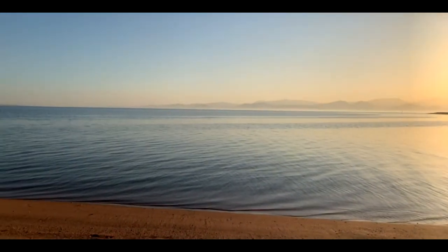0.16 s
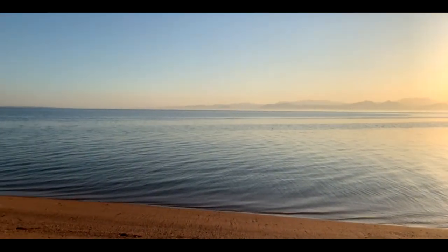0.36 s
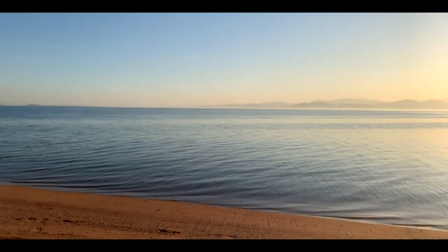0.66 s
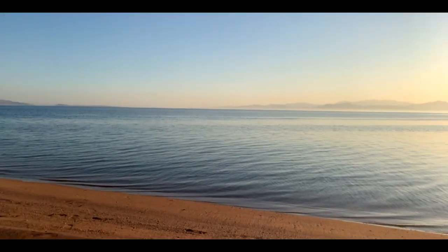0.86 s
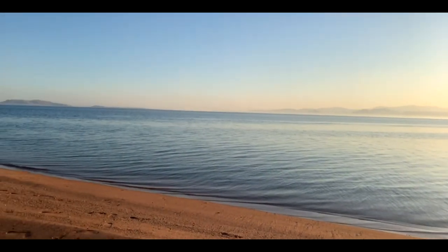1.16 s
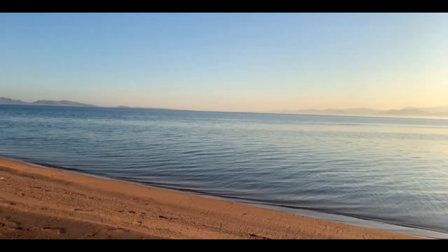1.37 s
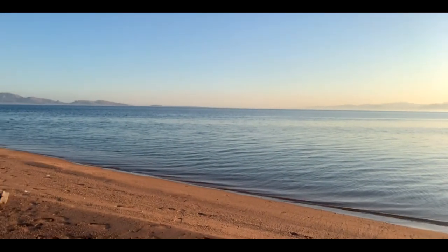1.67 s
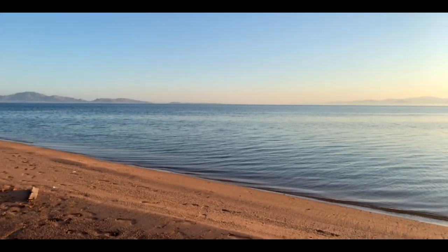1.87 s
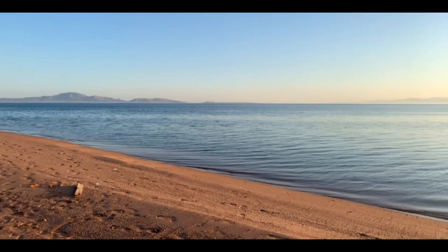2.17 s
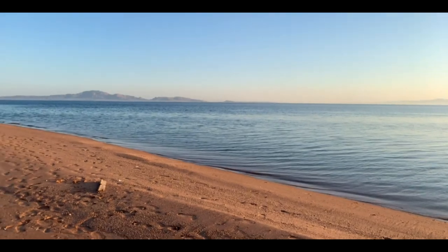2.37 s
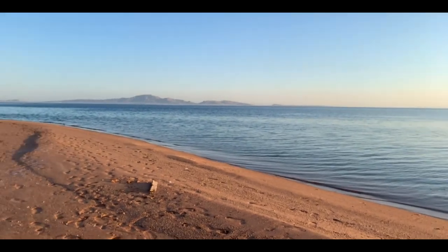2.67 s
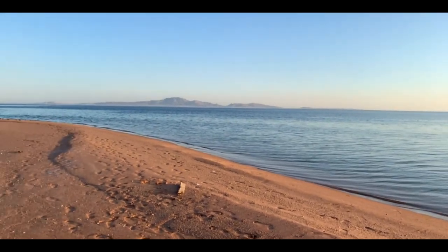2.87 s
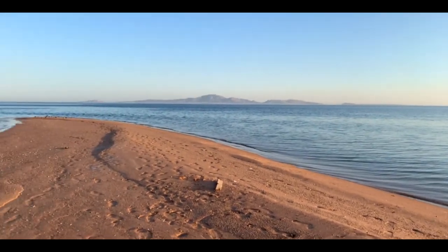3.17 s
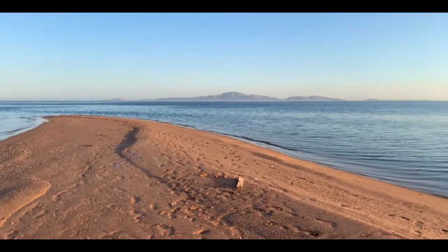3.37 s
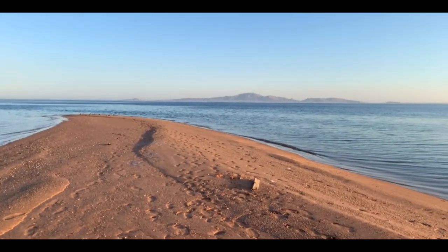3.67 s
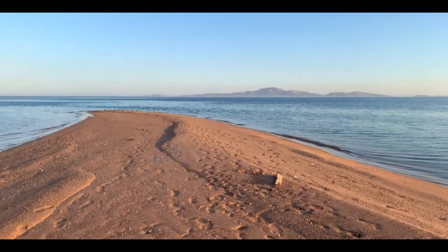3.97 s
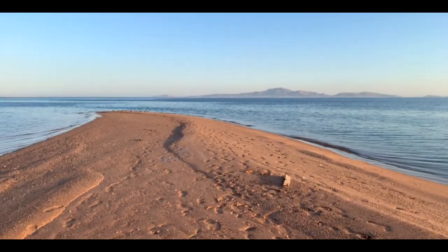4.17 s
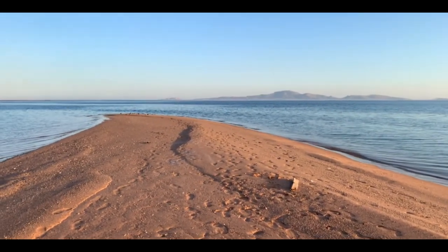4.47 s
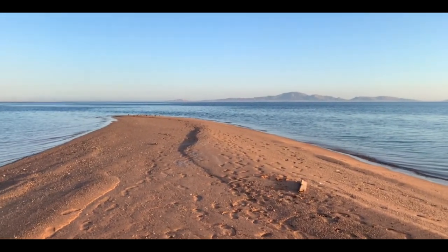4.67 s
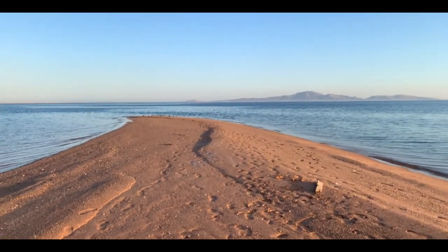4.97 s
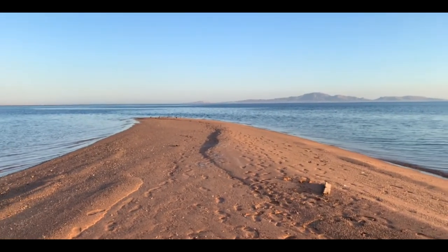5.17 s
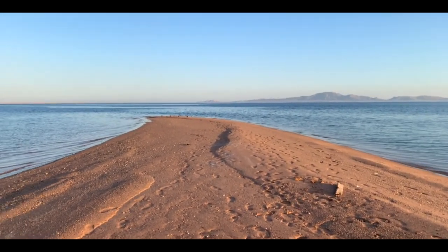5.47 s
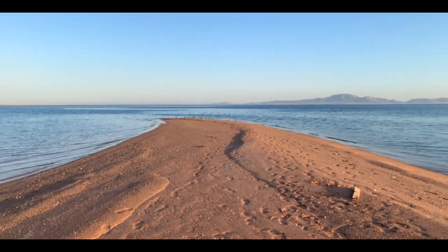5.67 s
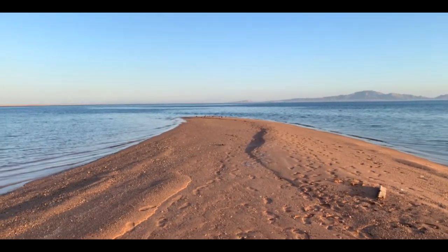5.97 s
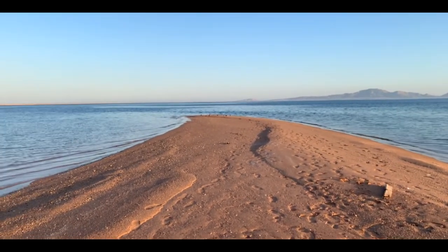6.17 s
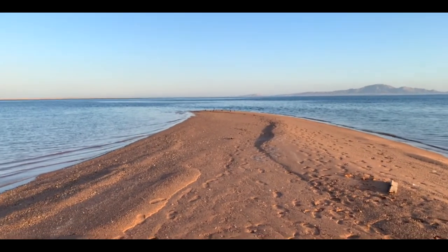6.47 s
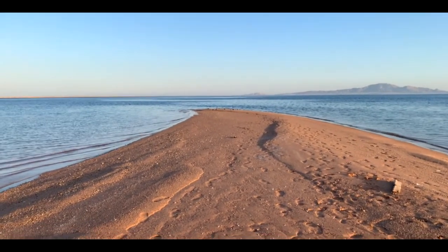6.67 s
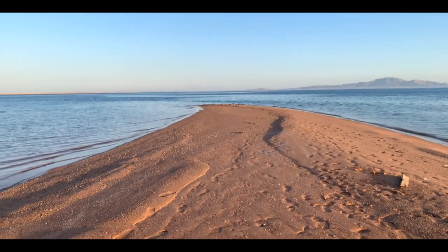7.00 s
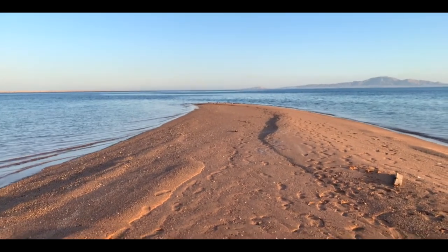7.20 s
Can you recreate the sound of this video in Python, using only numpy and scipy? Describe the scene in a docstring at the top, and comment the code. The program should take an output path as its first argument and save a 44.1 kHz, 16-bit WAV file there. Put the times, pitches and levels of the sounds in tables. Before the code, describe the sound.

Low wind rumble over a calm beach, trilling shore birds calling in a flock, then gentle lapping wavelets with plops and ticks.

```python
"""Wind thumps and buffets the microphone on a sand spit in a calm sea, and shore birds call from its tip.
Wind is shaped noise swelling in gusts; wavelets are clouds of bubbles with hiss, that slosh, splash and fizz.
Plops, gurgles and ticks are single ringing bubbles, rising tones and short cracks of noise.
The birds are gliding, often trilled harmonics: single calls nearer by, a rough overlapping flock behind.
The sound drops out once for an instant."""
import sys
import numpy as np
from scipy import signal
from scipy.fft import rfft, irfft, next_fast_len
from scipy.io import wavfile
from scipy.ndimage import uniform_filter1d

SR = 44100
rng = np.random.default_rng(int(sys.argv[2]) if len(sys.argv) > 2 else 0)


def materialize(psi):
    """Save the field psi as 16-bit PCM at rate SR to the path in sys.argv[1].

    A 1-D psi becomes a single channel; in a 2-D psi each row is a channel.
    """
    bounded = np.clip(np.atleast_2d(psi).T, -1, 1)
    quanta = np.round(bounded * 32767).astype(np.int16)
    wavfile.write(sys.argv[1], SR, quanta)


N = 323694
TIME = np.arange(N) / SR


def undb(db):
    """Decibels to gain."""
    return 10 ** (np.asarray(db) / 20)


def unit(x):
    """Scale to rms 1."""
    return x / np.sqrt(np.mean(x ** 2) + 1e-20)


def curve(table):
    """Join (time [s], level [dB]) points by straight lines, sample by sample."""
    times, levels_db = np.transpose(table)
    return np.interp(TIME, times, levels_db)


def colour(x, points):
    """Filter by a spectrum of (frequency [Hz], level [dB]) points, falling away beyond both ends; rms 1."""
    hz, db = np.transpose(points)
    f = np.maximum(np.arange(N + 1) * SR / (2 * N), 1)
    skirts = np.minimum(f / hz[0], 1) ** 2 * np.minimum(hz[-1] / f, 1) ** 2
    shape = skirts * undb(np.interp(np.log(f), np.log(hz), db))
    size = next_fast_len(N + SR // 10)
    gain = np.interp(np.arange(size // 2 + 1) * SR / size, f, shape)
    return unit(irfft(rfft(x, size) * gain, size)[:N])


def walk(rate):
    """Smooth random motion of rms 1, taking a new step `rate` times a second."""
    k = max(int(SR / rate), 2)
    steps = np.repeat(rng.standard_normal(N // 10)[:N // k + 1], k)
    return unit(uniform_filter1d(uniform_filter1d(steps, k), k)[:N])


def add(out, start_s, sound):
    """Mix a sound in at a time."""
    i = int(np.clip(start_s * SR, 0, N))
    out[i:i + len(sound)] += sound[:N - i]


def gust(peak_s, spread_s):
    """Pressure of one gust: a bell-shaped swell."""
    return np.exp(-.5 * ((TIME - peak_s) / spread_s) ** 2)


def turbulence(points, steady_s):
    """Eddy pressure with its own slow swell levelled out, leaving that to the gusts."""
    x = colour(rng.standard_normal(N), points)
    return x / np.sqrt(uniform_filter1d(x ** 2, int(steady_s * SR)) + 1e-6)


def wind():
    """Large eddies rumble; stronger gusts shed small, quick ones that buffet."""
    # spectra of the large and the small eddies: (frequency [Hz], level [dB])
    rumble_spectrum = [(12, -11.5), (25, -8), (45, 1), (62, -0.5), (90, -3), (125, -15.5), (200, -33),
                       (400, -58.5)]
    buffet_spectrum = [(50, -11.5), (100, 0.5), (140, 2.5), (190, -5), (260, -14), (400, -27.5),
                       (800, -53.5), (2000, -58)]
    # rumble of the breeze between the gusts: (time [s], level [dB])
    breeze = [(0, -35), (.3, -35), (.75, -30.5), (1.0, -36.5), (1.8, -32.5), (2.3, -31.5), (2.85, -26.5),
              (3.1, -36), (3.4, -39.5), (4.2, -43.5), (5.2, -41), (5.7, -41.5), (6.1, -39.5), (6.55, -37),
              (6.95, -34), (7.1, -41.5), (7.34, -43)]
    # gusts on the microphone: (peak time [s], spread [s], rumble [dB], buffeting before its lift [dB])
    gusts = [(0.174, 0.069, -23.5, -31.5), (0.243, 0.052, -25, -43), (0.396, 0.0086, -20.5, -40),
             (0.507, 0.017, -34, -39), (.84, 0.042, -26, -34), (1.212, 0.053, -28, -49),
             (1.48, 0.018, -30, -40.5), (1.904, 0.013, -19.5, -33), (1.971, 0.015, -21, -31),
             (2.126, .04, -20.5, -35), (2.236, 0.022, -22, -30), (2.345, 0.013, -20.5, -50),
             (2.432, 0.023, -23, -30), (2.621, 0.065, -24, -34), (2.836, .09, -26, -34),
             (3.185, 0.052, -32, -59), (3.81, .025, -36, -64), (4.03, 0.022, -31.5, -65),
             (4.557, .03, -36, -58), (4.79, 0.028, -37, -50), (5.004, 0.021, -36.5, -51),
             (5.163, .03, -35.5, -58), (5.457, 0.08, -33.5, -50), (5.95, 0.08, -29, -45.5),
             (6.292, 0.075, -30.5, -48.5), (6.482, 0.054, -26.5, -40.5), (6.736, 0.029, -30, -42),
             (6.93, 0.11, -30.5, -57)]
    breeze_buffet_db, buffet_lift_db = -12, 1.4  # the first is relative to the breeze's rumble

    breeze_db = curve(breeze)
    slow_power = undb(breeze_db) ** 2
    quick_power = undb(breeze_db + breeze_buffet_db) ** 2
    for peak_s, spread_s, rumble_db, buffet_db in gusts:
        power = gust(peak_s, spread_s) ** 2
        slow_power = slow_power + power * undb(rumble_db) ** 2
        quick_power = quick_power + power * undb(buffet_db) ** 2
    rumble = turbulence(rumble_spectrum, steady_s=0.0887) * undb(1.13 * walk(7.9))
    buffet = unit(turbulence(buffet_spectrum, steady_s=0.09) * undb(3.4 * walk(70)))
    return rumble * np.sqrt(slow_power) + buffet * np.sqrt(quick_power) * undb(buffet_lift_db)


def lap(break_s, build_s, run_s):
    """A wavelet builds up, breaks and runs out on the sand."""
    t = TIME - break_s
    return np.exp(-np.where(t < 0, (t / build_s) ** 2, t / run_s))


def bubble(hz, cycles, rise):
    """A pocket of air rings and dies; its pitch climbs from hz as it nears the surface."""
    life = cycles / hz
    u = np.arange(int(life * SR) + 2) / (life * SR)
    ring = np.sin(2 * np.pi * hz * life * (u + rise * u ** 2 / 2))
    return ring * np.exp(-4 * u) * (1 - np.exp(-u * 30))


def bubbles(low_hz, high_hz, cycles, spread_db, rise, count):
    """A cloud of bubbles at random times and pitches, many faint and a few loud; rms 1."""
    out = np.zeros(N)
    for when, pitch, size, ring in rng.random((count, 4)):
        gain = undb(-spread_db * np.log(size * .99 + .01))
        hz = low_hz * (high_hz / low_hz) ** pitch
        add(out, when * N / SR, gain * bubble(hz, cycles * (.5 + ring), rise))
    return unit(out)


def waves():
    """Each wavelet sloshes with large bubbles, splashes with small ones and fizzes into the sand."""
    # spectra of the three water sounds: (frequency [Hz], level [dB])
    slosh_spectrum = [(200, 14.5), (420, -4), (650, -3), (900, 1.5), (1300, -1), (2200, -11.5), (4000, -53)]
    splash_spectrum = [(600, -2.5), (1300, -6.5), (2400, 1.5), (3200, 3), (4100, -9.5), (5500, -13.5),
                       (8000, -21), (12000, -51)]
    fizz_spectrum = [(3000, 11), (4800, -1), (6000, -3), (7300, 1), (9200, -6.5), (10800, -14.5),
                     (13000, -12), (16000, -15)]
    # ripples all along the shore, before the lifts: (slosh [dB], splash [dB], fizz [dB])
    ripples_db = (-70, -63, -73)
    # wavelets reaching the sand, before the lifts: (break [s], build-up [s], run-out [s], splash [dB],
    #                                                slosh against splash [dB], fizz against splash [dB])
    wavelets = [(.17, 0.046, 0.23, -58.5, 2, -35), (.72, 0.092, 0.055, -65, 0, -28),
                (.92, 0.11, 0.3, -73.5, 13.5, -27), (1.38, 0.18, 0.6, -56, -10.5, -12.5),
                (2.06, 0.32, 0.2, -56.5, -12, -8.5), (2.3, 0.16, 0.48, -62.5, 2, -16.5),
                (3.22, 0.31, 0.27, -56, -8, -13.5), (3.52, 0.07, 0.13, -56, -8.5, -17),
                (3.7, .07, 0.17, -55, -1.5, -14), (3.92, 0.071, 0.091, -56, -3, -10),
                (4.05, 0.11, 0.21, -54.5, -9, -8.5), (4.24, 0.19, .2, -54.5, -4.5, -11.5),
                (4.63, 0.099, 0.13, -63, 3, -2.5), (4.86, 0.17, 0.27, -60.5, -7, -7),
                (5.3, 0.13, 0.19, -69, 3.5, 0.5), (6.16, 0.12, 0.45, -64.5, -4, -5),
                (6.4, 0.043, 0.37, -57, -6, -15.5), (7.06, 0.21, 0.42, -56.5, -6.5, -8),
                (7.32, .1, .3, -55.5, -3, -15)]
    slosh_lift_db, splash_lift_db, fizz_lift_db = 3.5, 4.5, 9.0
    fizz_lag_s = .015  # foam bursts just after the wavelet breaks

    slosh_power, splash_power, fizz_power = undb(ripples_db) ** 2
    for break_s, build_s, run_s, db, slosh_db, fizz_db in wavelets:
        power = (undb(db) * lap(break_s, build_s, run_s)) ** 2
        splash_power = splash_power + power
        slosh_power = slosh_power + power * undb(slosh_db) ** 2
        late_lap = lap(break_s + fizz_lag_s, build_s, run_s)
        fizz_power = fizz_power + (undb(db + fizz_db) * late_lap) ** 2
    large = bubbles(353.5, 1550, cycles=17, spread_db=2.0, rise=0.465, count=1400)
    small = bubbles(1012, 4550, cycles=22.4, spread_db=3.5, rise=0.4, count=6000)
    foam = bubbles(4120, 16100, cycles=26, spread_db=3.5, rise=0.042, count=4000)
    # the smallest, countless bubbles merge into a hiss
    slosh = colour(large + .9 * rng.standard_normal(N), slosh_spectrum)
    splash = colour(small + .9 * rng.standard_normal(N), splash_spectrum)
    fizz = colour(foam + 1.76 * rng.standard_normal(N), fizz_spectrum)
    water = slosh * np.sqrt(slosh_power) * undb(slosh_lift_db)
    water = water + splash * np.sqrt(splash_power) * undb(splash_lift_db)
    water = water + fizz * np.sqrt(fizz_power) * undb(fizz_lift_db)
    return water * undb(1.2 * walk(25))  # the water folds unevenly


def plops():
    """A drop slaps the surface and traps a bubble."""
    # single drops and air pockets: (time [s], level [dB], first pitch [Hz], length in cycles of that pitch)
    drops = [(0.327, -40, 1140, 14), (0.634, -37, 2540, 16), (1.608, -40, 1820, 14),
             (3.179, -32.5, 1510, 14), (3.319, -34.5, 1700, 21), (3.495, -28.5, 2270, 14),
             (3.6, -35, 2020, 17), (3.627, -34.5, 2260, 25), (3.708, -30, 2290, 23), (4.014, -34, 2180, 16),
             (4.123, -40, 1320, 13), (4.241, -34, 1310, 14), (4.633, -32.5, 1270, 16),
             (4.964, -34.5, 1810, 13), (5.27, -40, 1120, 28), (6.099, -38, 2030, 22),
             (6.131, -36, 2740, 16), (6.394, -37, 2070, 38), (6.584, -36, 2560, 26), (6.668, -35, 1990, 11),
             (6.995, -34, 1750, 28)]
    out, t = np.zeros(N), np.arange(SR // 30) / SR
    for start_s, db, hz, cycles in drops:
        slap = signal.lfilter([1, 1], [1, -.5], rng.standard_normal(len(t))) * np.exp(-t / 0.0021)
        add(out, start_s, undb(db) * bubble(hz, cycles, rise=0.37))
        add(out, start_s, undb(db - 25) * slap)
    return out


def gurgles():
    """Air trapped under a folding wavelet climbs in pitch as its pocket opens."""
    # rising pockets of air: (time [s], length [s], first pitch [Hz], last pitch [Hz], level [dB])
    pockets = [(0.129, 0.014, 800, 1110, -56), (0.163, 0.018, 790, 1560, -48),
               (0.58, 0.02, 1356, 2230, -50.5), (0.944, 0.035, 960, 1400, -59),
               (1.202, 0.038, 890, 1560, -58.5), (2.422, 0.049, 848, 1365, -55),
               (2.461, 0.035, 1700, 2530, -56.5), (2.783, 0.038, 1500, 2400, -60),
               (3.676, 0.042, 437, 534, -54.5), (3.771, 0.036, 557, 670, -57.5),
               (3.881, 0.032, 475, 574, -50), (3.886, .04, 658, 1460, -44),
               (4.013, 0.027, 937, 1040, -50.5), (4.234, 0.032, 514, 630, -66),
               (4.31, 0.027, 1130, 1620, -51), (6.265, 0.035, 890, 1040, -49),
               (6.895, 0.035, 820, 986, -50.5), (7.264, 0.048, 817, 1230, -56)]
    out, wobble = np.zeros(N), walk(350)
    for start_s, length, first_hz, last_hz, db in pockets:
        u = np.linspace(0, 1, int(length * SR))
        shake = np.roll(wobble, -int(start_s * SR))[:len(u)]
        hz = first_hz * (last_hz / first_hz) ** u * (1 + 0.059 * shake)
        swell = np.sqrt(u) * (1 - u) * undb(2.7 * shake[::-1])
        ring = np.sin(2 * np.pi * np.cumsum(hz) / SR) * swell
        add(out, start_s, undb(db) * unit(ring))
    return out


def ticks():
    """Tiny droplets burst with a short, bright crack: a decaying puff of noise in a narrow band."""
    # sharp ticks of spray: (time [s], peak level before a 2 dB cut [dB], pitch [Hz])
    spray = [(0.7564, -61, 13100), (1.608, -43, 4500), (2.5058, -45, 4600), (3.236, -40, 5710),
             (3.5129, -44.5, 7120), (3.5853, -46, 5250), (4.2872, -40, 5600), (6.129, -44, 8900),
             (6.159, -38.5, 4960), (6.392, -34, 4040), (6.604, -37, 3540), (6.7272, -42, 4500),
             (7.1497, -34.5, 5220), (7.21, -45, 9960)]
    out, t = np.zeros(N), np.arange(SR // 100) / SR
    for start_s, db, hz in spray:
        band = signal.butter(1, [.9 * hz, 1.04 * hz], "bandpass", fs=SR)
        crack = signal.lfilter(*band, rng.standard_normal(len(t)) * np.exp(-t / 0.0015))
        add(out, start_s, undb(db - 2) * crack / np.abs(crack).max())
    return out


def call(length, pitches, trill_hz, depth, harmonics_db, rasp, rolloff_db=10, edge_s=0.014):
    """One note: the syrinx follows an arched pitch; a trill cuts it into strokes that each hook downward."""
    t = np.arange(int(length * SR)) / SR
    rasp = rasp[:len(t)]
    beat = trill_hz * (t + .04 * np.cumsum(rasp) / SR) % 1  # position within the stroke, 0-1
    dip = (1 - np.sin(np.pi * beat ** 1.2)) ** 1.5
    # a smooth curve through evenly spaced pitches
    knots = np.linspace(0, length, len(pitches))
    arch = np.polyval(np.polyfit(knots, pitches, len(pitches) - 1), t)
    hook = depth * (.04 - .2 * dip - .09 * (beat - .5))
    hz = arch * (1 + hook + .006 * rasp)
    phase = 2 * np.pi * np.cumsum(hz) / SR
    # slow trills close the syrinx further between strokes than fast ones
    closure = np.clip(depth * np.interp(trill_hz, [50, 57], [1.3, .55]), 0, 1)
    stroke = 1 - closure * np.cos(np.pi * (beat - .08)) ** 4
    edges = np.clip(np.minimum(t, length - t) / edge_s, 0, 1)
    opening = edges * np.sin(np.pi * t / length).clip(0) ** 0.12
    opening = unit(opening * stroke * undb(1.6 * rasp[::-1]))
    # turbulent air spreads a hoarse skirt around every harmonic
    lowpass = signal.butter(2, 500, fs=SR, output="sos")
    air = unit(signal.sosfilt(lowpass, rng.standard_normal(len(t))))
    hoarse = 1 + undb(-25) * air
    # two more harmonics below the last one given
    upper_db = harmonics_db[-1] - rolloff_db - np.array([1.5, 0])
    tone = sum(undb(db) * np.sin(k * phase) for k, db in enumerate([*harmonics_db, *upper_db], 1))
    return np.sqrt(2) * opening * hoarse * tone


def near_birds():
    """The calls that stand out from the flock: each glides along an arch and is usually loudest at its octave."""
    # bird calls: (start [s], length [s], pitch at the middle before trill and rasp [Hz],
    #              glide from start to end [Hz], arch [Hz], trill rate [Hz], trill depth [0-1],
    #              octave [dB], fundamental against octave [dB], third harmonic against octave [dB])
    notes = [(.09, 0.14, 1630, -53, 100.5, 51.4, 0.4, -47.5, -23, -34),
             (0.209, .13, 1149, -6, -39.5, 49, 0.27, -53.5, -11, -4),
             (0.427, 0.17, 1794, -100, 182, 42.6, 0.43, -61.5, -4.5, -23),
             (0.56, 0.12, 1695, 88, -28, 50, 0.31, -56.5, -2, -13),
             (0.597, 0.18, 1200, -180, 27.5, 50, 0.38, -54, -20, -3),
             (0.81, 0.12, 1654, -35, 74, 49.6, 0.55, -58.5, -22, -20),
             (.91, 0.11, 1148, -130, 23, 49.5, 0.1, -58, -13, -9),
             (1.0, 0.12, 1730, -190, 65, 46.2, 0.32, -53.5, -28, -26),
             (1.121, 0.094, 1770, -100, 53, 44.7, 0.47, -57, -13, -24),
             (1.242, 0.14, 1548, -53, 117.5, 57.8, .14, -37, -23, -20),
             (1.256, 0.14, 1144, -240, 53, 49.6, 0.45, -54, -3, -4),
             (1.361, .17, 1232, -110, 46, 50.3, 0.4, -54, -11, 3.5),
             (1.36, 0.11, 1489, -30, 40.5, 58.6, 1.0, -37.5, -22, -22),
             (1.621, 0.086, 1330, 90, 202, 57, 0.43, -48, -5, -19),
             (1.686, .07, 1046, -200, -61, 55.3, 0.57, -47, -4, -15),
             (1.779, 0.13, 1695, 42, 171, 56, .5, -50, -4, -12),
             (1.895, 0.2, 1540, -190, 15.5, 58.1, 0.57, -48.5, -3, -12),
             (2.04, 0.13, 1593, -102, 116, 59.6, 0.09, -34, -36, -35),
             (2.064, .147, 1197, -100, 36, 54.3, 0.34, -46.5, -28, -17),
             (2.184, 0.084, 1600, 43, 126, 57.8, 0.47, -37.5, -32, -20),
             (2.282, .123, 1265, -240, -21, 50.3, 0, -60.5, -11, -2),
             (2.594, 0.18, 1712, -115, 56, 37.4, 0.4, -59, -18, -1),
             (2.999, 0.17, 1500, -49, 30.5, 51.8, .4, -53.5, 1, -7),
             (3.07, 0.14, 1236, -330, 8, 48.5, 0.37, -51.5, -17, -18),
             (3.206, 0.061, 1226, -64, 21, 50, 0.02, -52, -13, -10),
             (4.025, .125, 1868, -89, 150, 49.7, 0.67, -50, -6.5, -4.5),
             (4.146, 0.12, 1670, -190, 7, 50.3, .68, -57, -17, -9),
             (4.577, .144, 1332, -378, 17, 48.4, .25, -54.5, 1, -11),
             (4.833, 0.16, 1733, -43, 31.5, 37, .58, -65, 10, 10.5),
             (5.223, .107, 1836, 14, 215, 49.6, 0.6, -50.5, -7.5, -3),
             (5.319, 0.046, 1228, -10, -48, 46, 0.6, -51.5, -7.5, 0.5),
             (5.362, 0.04, 1606, -83, 6, 49.7, .86, -53, -14, -4),
             (5.692, 0.086, 1593, -230, 2, 50.3, 0.14, -70.5, 14.5, 5.5),
             (5.774, .07, 1257, -87, -16, 50.7, 0.19, -50, -5, -5.5),
             (6.43, .16, 1293, -350, -14, 51.5, 0.21, -52.5, -2, -14),
             (6.763, 0.13, 1763, 145, 89.5, 47.1, .8, -47.5, -10, -3),
             (6.851, 0.089, 1547, -86, 19, 46.4, 0.44, -59, -1, 8),
             (6.864, 0.11, 1717, -150, 0, 46.2, 0.72, -40.5, -20, -21),
             (7.262, 0.081, 1665, -340, 113, 50, 0.33, -57, 4.5, -7)]
    # the fourth harmonic follows the stronger of these two, both against the octave
    octave_to_fourth_db, third_to_fourth_db = -27, -13.5
    out, rasp = np.zeros(N), walk(450)
    for start, length, hz, glide_hz, arch_hz, trill_hz, depth, db, first_db, third_db in notes:
        pitches = [hz - arch_hz - glide_hz / 2, hz, hz - arch_hz + glide_hz / 2]
        fourth_db = max(octave_to_fourth_db, third_db + third_to_fourth_db)
        harmonics_db = db + np.array([first_db, 0, third_db, fourth_db])
        own_rasp = np.roll(rasp, -int(start * SR))
        add(out, start, call(length, pitches, trill_hz, depth, harmonics_db, own_rasp))
    return out


def flock(count=90):
    """Further birds call in the same manner, rough and overlapping, at random times and pitches."""
    # colour of the distant flock: (frequency [Hz], level [dB])
    flock_spectrum = [(900, -49), (1500, -6), (2000, -8.5), (2500, -2.5), (3300, -7), (3700, -8.5),
                      (4200, -17), (5200, -23), (7000, -24.5), (11000, -55)]
    # excitement of the distant flock, before the distance cut: (time [s], level [dB])
    chatter = [(0, -56.5), (.65, -56.5), (1.1, -59), (1.4, -47.5), (1.65, -56), (1.9, -48), (2.2, -41.5),
               (2.45, -65.5), (2.7, -54), (2.9, -67), (3.15, -55.5), (3.5, -56), (5.5, -65), (6.1, -54.5),
               (6.65, -69), (6.95, -54), (7.3, -61)]
    out, rasp = np.zeros(N), 2 * walk(450)
    harmonics_db = [-3.5, -0.5, 3.0, -2]
    for when, pitch, length, depth, size in rng.random((count, 5)):
        pitches = (1200 + 600 * pitch) * np.array([0.92, 1.03, .98, .91])
        own_rasp = np.roll(rasp, int(when * N))
        note = call(0.074 + .1 * length, pitches, 48.9, .15 + depth * 0.584, harmonics_db, own_rasp)
        add(out, when * N / SR, undb(-5 * size) * note)
    return colour(out, flock_spectrum) * undb(curve(chatter))


def scatter(x, t60, wet_db):
    """Ripples and sand scatter a short diffuse tail behind a sound; t60 is its 60 dB decay in seconds."""
    t = np.arange(SR // 2) / SR
    tail = rng.standard_normal(len(t)) * np.exp(-np.log(1000) * t / t60)
    return x + undb(wet_db) * signal.fftconvolve(x, tail / np.linalg.norm(tail))[:N]


def scene():
    """Wind, water and birds at one microphone; the distant flock is more diffuse than the nearer calls."""
    drops = scatter(plops() + gurgles(), t60=.15, wet_db=-12)
    near = scatter(near_birds(), t60=.3, wet_db=-15)
    far = undb(-2) * scatter(flock(), t60=.35, wet_db=-6)  # distance cut
    return (wind() + waves() + drops + ticks() + near + far)[None]


def record(dry):
    """The sound cuts out for an instant; a steep low-pass takes off the top."""
    # the instant of silence: (start [s], end [s])
    silence = (5.757, 5.774)
    top_hz = 15800
    live = (TIME < silence[0]) | (TIME > silence[1])
    lowpass = signal.ellip(10, .2, 70, top_hz, fs=SR, output="sos")
    return signal.sosfilt(lowpass, dry * live)


dry = scene()
out = record(dry)
materialize(out)
```